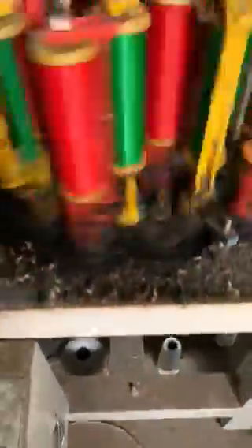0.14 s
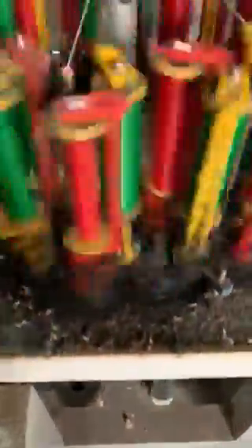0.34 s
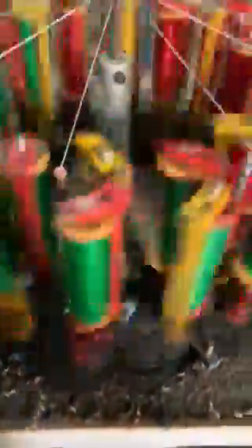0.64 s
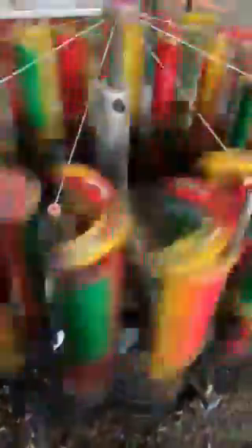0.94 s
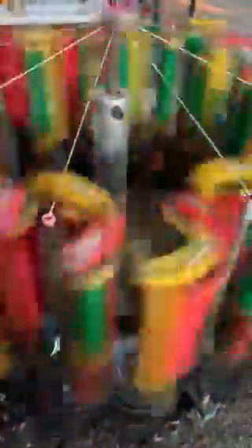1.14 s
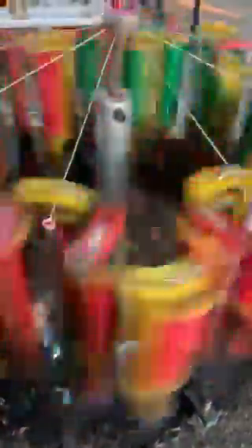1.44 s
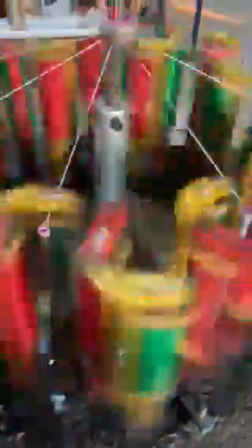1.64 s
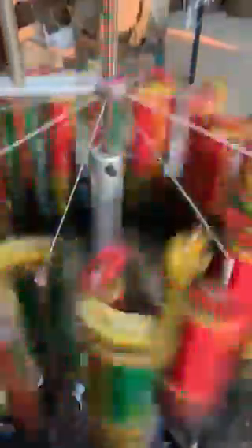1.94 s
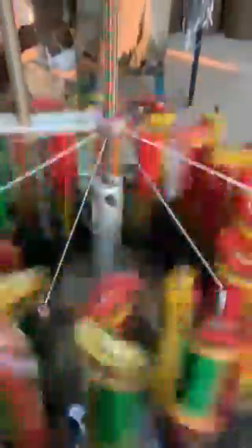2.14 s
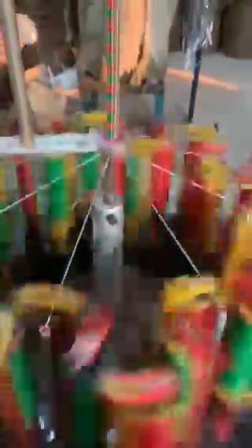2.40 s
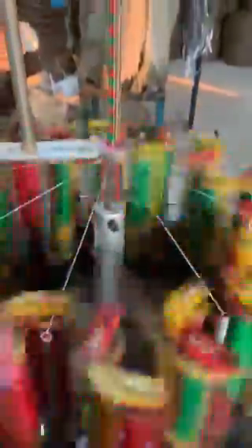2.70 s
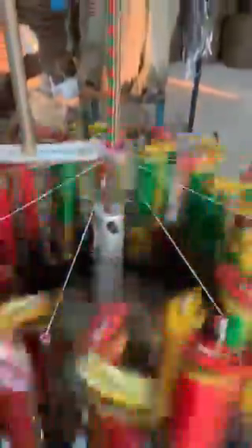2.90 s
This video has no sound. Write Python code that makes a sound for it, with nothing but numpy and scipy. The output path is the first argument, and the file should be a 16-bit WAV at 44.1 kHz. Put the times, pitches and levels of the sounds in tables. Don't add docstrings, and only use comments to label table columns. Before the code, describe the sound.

Braiding machine clattering close by, dense steel rattle pulsing about ten times a second without pause

```python
import sys
import numpy as np
from scipy import signal
from scipy.fft import rfft, irfft, dct, next_fast_len
from scipy.io import wavfile
from scipy.ndimage import uniform_filter1d, map_coordinates

SR = 44100
rng = np.random.default_rng(int(sys.argv[2]) if len(sys.argv) > 2 else 0)


def dump(signal):
    limited = np.clip(np.atleast_2d(signal).T, -1, 1)
    pcm = np.round(limited * 32767).astype(np.int16)
    wavfile.write(sys.argv[1], SR, pcm)


def field_ratio(decibels):
    return 10 ** (np.asarray(decibels, dtype=float) / 20)


N = 134946


def rms_one(x):
    return x / np.sqrt(np.mean(x ** 2) + 1e-20)


def at_hz(points, hz):
    p = np.array(points)
    return np.interp(np.log(hz + 1), np.log(p[:, 0]), p[:, 1])


def shape(x, gain):
    return irfft(rfft(x) * gain(np.fft.rfftfreq(N, 1 / SR)), N)


def drift(rate):
    knots = rng.standard_normal(400)
    return map_coordinates(knots, [np.arange(N) / SR * rate * 2 + 2], order=3)


def resonate(x, hz, width_hz):
    r = np.exp(-np.pi * width_hz / SR)
    top = np.array([1, 0, -1]) * (1 - r * r) / 2
    ring = [1, -2 * r * np.cos(2 * np.pi * hz / SR), r * r]
    return signal.lfilter(top, ring, x + 1e-18)


def dying(start_s, level_db, t60_s):
    kicks = np.zeros(N + SR)
    places = (np.clip(start_s + .5, 0, 3.5) * SR).astype(int)
    np.add.at(kicks, places, field_ratio(level_db) ** 2)
    power = signal.lfilter([1], [1, -field_ratio(-120 / (t60_s * SR))], kicks)
    return power[SR // 2:SR // 2 + N]


def shaking(level_db):
    # start_s (into the cycle), strength_db, rattle_t60_s
    contacts = [
        (.0005, -3.5, 0.37),
        (.011, -23, 0.036),
        (.020, -37, 0.045),
        (0.038, 0, 0.097),
        (0.05, 4, 0.1),
        (.058, -10.5, 0.07),
        (0.065, -4.5, 0.03),
        (.075, -40.5, 0.054),
        (0.087, -3.5, 0.11),
    ]
    # start_s, peak_db
    slams = [(0.0408, -14), (0.1471, -36), (0.2352, -10), (0.329, -11), (0.4276, -12), (0.7167, -25),
             (0.813, -15), (1.0028, -16), (1.1024, -21), (1.197, -18), (1.2956, -21), (1.4036, -10.5),
             (1.5934, -12), (1.684, -20), (1.776, -11.5), (1.8746, -32), (1.9744, -13), (2.169, -18),
             (2.262, -25), (2.371, -15), (2.4563, -22), (2.647, -14), (2.744, -10), (2.9386, -10)]
    handovers_per_s = 10.34
    jitter_s, spread_db = .0005, 0.2
    constant_rattle_db = -2
    slam_gain_db, slam_t60_s = 8.5, 0.045

    turns = np.arange(-2, 32) / handovers_per_s
    power = field_ratio(constant_rattle_db) ** 2
    for start_s, strength_db, t60_s in contacts:
        late, harder = rng.standard_normal((2, len(turns)))
        times = turns + start_s + jitter_s * late
        power = power + dying(times, strength_db + spread_db * harder, t60_s)
    loop = field_ratio(level_db) * rms_one(np.sqrt(power))
    slam_s, slam_db = np.transpose(slams)
    slam_power = dying(slam_s, slam_db - 20.5 + slam_gain_db, slam_t60_s)
    return np.sqrt(loop ** 2 + slam_power)


def strikes(shake, per_s, spread_db, widths_hz, pitches_hz, patch_db):
    patch_s = .05
    count = len(pitches_hz)
    sizes = field_ratio(spread_db * np.minimum(rng.exponential(1, N), 5)) * rng.choice([-1, 1], N)
    blows = sizes * (rng.random(N) < per_s / SR) * shake
    dealt = rng.integers(0, count, N)
    patches = uniform_filter1d(rng.standard_normal((count, 400)), size=1 + count // 40, axis=0)
    patches = rms_one(patches)
    patch_now = (np.arange(N) / SR / patch_s).astype(int) % patches.shape[1]
    blows *= field_ratio(patch_db * patches[dealt, patch_now])
    total = np.zeros(N)
    for k, (hz, width_hz) in enumerate(zip(pitches_hz, widths_hz)):
        total += resonate(blows * (dealt == k), hz, width_hz) * np.sqrt(hz / width_hz)
    return rms_one(total)


def clatter(shake):
    # pitch_hz, level_db (per Hz)
    clatter_colour = [(50, -71), (600, -5.5), (1900, 1.5), (3300, 0.5), (5600, 3), (7600, -1.5),
                      (11000, -4), (15800, -7)]
    ticks_per_s, tick_spread_db, tick_patch_db, tick_cycles = 7000, 2.0, .8, 13
    pings_per_s, ping_spread_db, ping_patch_db, ping_t60_s = 2500, 1.8, 3.5, .05
    tick_db, ping_db, hiss_db, clatter_db = -5.5, -9, -6, 3.5

    dull_hz = np.geomspace(600, 16000, num=24)
    clear_hz = np.geomspace(900, 15500, num=90) * rng.uniform(.985, 1.015, 90)
    dull_widths_hz = 2.6 * dull_hz / tick_cycles
    clear_widths_hz = np.full(len(clear_hz), 1.2 / ping_t60_s)
    ticks = strikes(shake, ticks_per_s, tick_spread_db, dull_widths_hz, dull_hz, tick_patch_db)
    pings = strikes(shake ** 1.5, pings_per_s, ping_spread_db, clear_widths_hz, clear_hz, ping_patch_db)
    hiss = shake * rng.standard_normal(N)
    size = np.sqrt(np.mean(shake ** 2))
    mix = size * (field_ratio(tick_db) * ticks + field_ratio(ping_db) * pings) + field_ratio(hiss_db) * hiss
    coloured = shape(mix, lambda hz: field_ratio(at_hz(clatter_colour, hz)))
    return field_ratio(clatter_db) * size * rms_one(coloured)


def rumble(level_db, shake):
    # pitch_hz, level_db (per Hz)
    rumble_colour = [(25, -50), (45, -30.5), (80, -10), (190, -1.5), (300, -0.5), (450, -3.5), (900, -7),
                     (2500, -21)]
    rumble_db, follows, patchy_db, throb_power = -29.5, 1.9, 1.13, 0.68

    noise = rms_one(shape(rng.standard_normal(N), lambda hz: field_ratio(at_hz(rumble_colour, hz))))
    patchy = np.zeros(N)
    for k in range(-1, 10):
        octave = shape(noise, lambda hz: np.clip(1 - abs(np.log2(hz / 30 + 1e-9) - k), 0, 1))
        patchy += octave * field_ratio(patchy_db * drift(5.6))
    throb = (shake / field_ratio(level_db)) ** throb_power
    return field_ratio(rumble_db + follows * (level_db - level_db.mean())) * throb * patchy


def hum():
    # pitch_hz, width_hz, level_db (rms), left_minus_right_db
    gear_tones = [(184, 18, -42, 1.5), (281, 40, -42, 1.5), (387, 14, -44, .1), (766, 22, -44.5, -2.5),
                  (1145, 80, -47, -1.5), (1880, 300, -44, .1)]
    total = np.zeros((2, N))
    for hz, width_hz, level_db, pan_db in gear_tones:
        once = resonate(rng.standard_normal(N), hz, width_hz)
        tone = rms_one(resonate(once, hz, width_hz))
        total += field_ratio(level_db) * tone * field_ratio(np.array([[pan_db / 2], [-pan_db / 2]]))
    return total


def knocks():
    # start_s, peak_db, ring_hz, brightness_db
    knock_table = [(0.0427, -9.5, 1510, 4), (0.0925, -18, 2120, 1), (0.2169, -8, 1860, -1),
                   (0.2355, -5, 1750, -3), (0.3283, -13, 1910, -5), (0.4264, -8, 1760, -6),
                   (0.4867, -19, 1270, -6), (0.6216, -9, 1730, -10), (0.7153, -7, 2250, 0),
                   (0.8118, -12, 1870, 1), (0.9193, -12, 1900, 1), (1.0043, -14, 1990, -3),
                   (1.0174, -8, 2850, -3), (1.1049, -8.5, 1990, -1), (1.1987, -11, 2434, -3),
                   (1.2945, -12, 1580, -8), (1.3064, -6, 2370, 2), (1.3473, -3, 3880, -5),
                   (1.4022, -6, 2050, -14), (1.487, -6, 2400, -1), (1.5955, -8.5, 1680, 1),
                   (1.6868, -17, 2070, 4), (1.735, -13, 1780, -3), (1.7784, -12, 2820, -4),
                   (1.7927, -16, 1880, -3), (1.8741, -17, 3600, 2), (1.8896, -4, 2830, -1),
                   (1.9732, -9, 1620, -3), (2.0203, -16, 1780, -5), (2.0682, -22, 1520, -9),
                   (2.082, -24, 2700, 5), (2.166, -11, 2020, -1), (2.2618, -15, 1980, -3),
                   (2.2737, -16, 1620, -7), (2.371, -6, 2660, -3.5), (2.4563, -21, 1880, -3),
                   (2.5534, -15, 1850, -3), (2.649, -14, 1350, -3), (2.7077, -9.5, 1530, 1),
                   (2.7455, -20, 1890, -3), (2.8404, -12, 3036, -6), (2.8543, -14, 1720, -7),
                   (2.9397, -17, 1180, -3)]
    knock_db, t60_s, width_hz, edge_hz = -9.5, 0.041, 450, 5000

    out, length = np.zeros(N + SR), SR // 20
    fade = field_ratio(-60 * np.arange(length) / SR / t60_s)
    bright_filter = signal.butter(2, edge_hz, "high", fs=SR, output="sos")
    for start_s, peak_db, ring_hz, bright_db in knock_table:
        noise = rng.standard_normal(length)
        ring = resonate(noise * fade, ring_hz, width_hz)
        crack = signal.sosfilt(bright_filter, noise * fade ** 2)
        knock = ring / abs(ring).max() + field_ratio(bright_db) * crack / abs(crack).max()
        first = int(start_s * SR)
        out[first:first + length] += field_ratio(peak_db + knock_db) * knock
    return out[:N]


def cracks():
    # start_s, peak_db, ring_hz
    crack_table = [
        (.4268, -11, 7000),
        (1.4028, -13, 5800),
    ]
    t60_s, width_hz = .02, 1500

    out, length = np.zeros(N), SR // 40
    fade = field_ratio(-60 * np.arange(length) / SR / t60_s)
    for start_s, peak_db, ring_hz in crack_table:
        ring = resonate(rng.standard_normal(length) * fade, ring_hz, width_hz)
        first = int(start_s * SR)
        out[first:first + length] += field_ratio(peak_db) * ring / abs(ring).max()
    return out


def shop(x):
    shop_t60_s, wall_cut_hz = 0.31, 5500
    size = next_fast_len(N + SR)
    w = 2 * np.pi * np.fft.rfftfreq(size)
    dull = 1 / (1 + 1j * w * SR / (2 * np.pi * wall_cut_hz))
    spectrum = rfft(x, size)
    sides = []
    for lags_s in rng.uniform(.02, .06, (2, 8)):
        echoes = 0
        for lag_s in lags_s:
            once = field_ratio(-60 * lag_s / shop_t60_s) * dull * np.exp(-1j * w * lag_s * SR)
            echoes = echoes + once / (1 - once)
        sides.append(irfft(spectrum * echoes, size)[:N])
    return np.array(sides)


def ports(direct, other):
    # pitch_hz, right_leads_radians
    port_phase = [(120, .05), (500, .9), (1050, .9), (1500, -.1), (4680, -3.14), (6900, -6.28),
                  (8960, -9.42), (15160, -18.85)]
    # pitch_hz, share (0-1)
    diffuse = [(40, .08), (120, 0), (400, .2), (900, .55), (1600, .3), (3600, .5), (4700, .09),
               (15000, .065)]
    # pitch_hz, left_minus_right_db
    port_balance = [(40, 1.5), (150, -0.7), (380, 2.5), (700, -3.5), (1300, -2), (3000, -0.3), (6000, 0.1)]

    hz = np.fft.rfftfreq(N, 1 / SR)
    phase = np.interp(hz, *np.transpose(port_phase))
    balance_db = at_hz(port_balance, hz)
    share = np.clip(at_hz(diffuse, hz), 0, 1) / 2
    out = []
    for way in (-1, 1):
        turn = field_ratio(-way * balance_db / 2) * np.exp(.5j * way * phase)
        common = shape(direct, lambda _: turn * np.sqrt(1 - share))
        differing = shape(other, lambda _: turn * np.sqrt(share))
        out.append(common + way * differing)
    return np.array(out)


def scene():
    # start_s, level_db
    nearness = [(0, -24), (.5, -25), (1.0, -25.5), (1.6, -26), (2.299, -26), (3.06, -27)]
    hum_follows, shop_db = .3, -25.5

    level_db = np.interp(np.arange(N) / SR, *np.transpose(nearness))
    shake = shaking(level_db)
    direct = clatter(shake) + rumble(level_db, shake)
    other = clatter(shake) + rumble(level_db, shake)
    machine = ports(direct + knocks() + cracks(), other)
    gears = field_ratio(hum_follows * (level_db - level_db.mean())) * hum()
    to_walls = shape(direct, lambda hz: hz ** 2 / (hz ** 2 + 300 ** 2))
    return machine + gears + field_ratio(shop_db) * shop(to_walls)


def joint_stereo(x):
    band_edges = np.r_[80, 88, 96, 108, 120, 132, 144, 160, 176, 196, 216, 240, 264, 292, np.arange(320, 800, 32)]
    block, block_start = 1024, 888
    kept_whole_s = 1.88
    weak_sum_db, weak_difference_db, residue_db = -7.2, -5.5, -48
    hole_db, hole_rise_db_per_khz, lowest_hole_line = -8.6, .33, 20
    dead_zone_share = .14

    pad = 2 * block - block_start
    window = np.sin(np.pi * (np.arange(2 * block) + .5) / (2 * block))
    parts = np.pad([x[0] + x[1], x[0] - x[1]], ((0, 0), (pad, 2 * block))) / 2
    index = np.arange(0, N + pad, block)[:, None] + np.arange(2 * block)
    a, b, c, d = np.split(parts[:, index] * window, 4, axis=-1)
    folded = np.concatenate([-c[..., ::-1] - d, a - b[..., ::-1]], -1)
    lines = dct(folded, type=4, norm="ortho")

    number = np.arange(block)
    groups = uniform_filter1d(lines ** 2, size=8)[..., 4::8].repeat(8, -1)
    around = uniform_filter1d(lines ** 2, size=64)
    faint_db = hole_db + hole_rise_db_per_khz * number / block * SR / 2000
    lines *= (groups > around * field_ratio(2 * faint_db)) | (number < lowest_hole_line)

    spared = abs(index[:, block] - pad - kept_whole_s * SR) < block / 2
    weak = field_ratio([[2 * weak_sum_db], [2 * weak_difference_db]])
    for low, high in zip(band_edges, band_edges[1:]):
        band = lines[..., low:high]
        power = (band ** 2).mean(-1)
        heard = abs(band) > dead_zone_share * np.sqrt(power)[..., None]
        strong = (power > power[::-1] * weak) | spared
        lines[..., low:high] *= heard * np.maximum(strong, field_ratio(residue_db))[..., None]

    u, v = np.split(dct(lines, type=4, norm="ortho"), 2, axis=-1)
    unfolded = np.concatenate([v, -v[..., ::-1], -u[..., ::-1], -u], -1) * window
    out = np.zeros_like(parts)
    for part, blocks in zip(out, unfolded):
        np.add.at(part, index, blocks)
    mid, side = out[:, pad:pad + N]
    return np.array([mid + side, mid - side])


def band_limit(x):
    return signal.sosfilt(signal.butter(12, 17020, fs=SR, output="sos"), x)


def record(dry):
    rounding_top, cutoff_hz = .9, 15740
    rounded = rounding_top * np.tanh(dry / rounding_top)
    cut = [shape(side, lambda hz: np.clip((cutoff_hz + 60 - hz) / 60, 0, 1) ** 3) for side in rounded]
    finished = joint_stereo(np.array(cut))
    return band_limit(finished)


dry = scene()
out = record(dry)
dump(out)
```